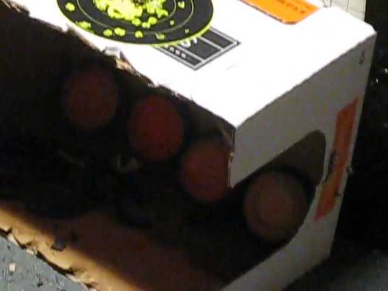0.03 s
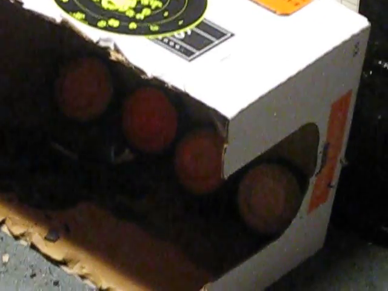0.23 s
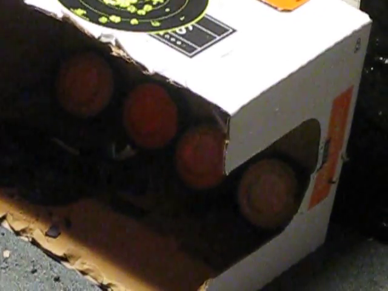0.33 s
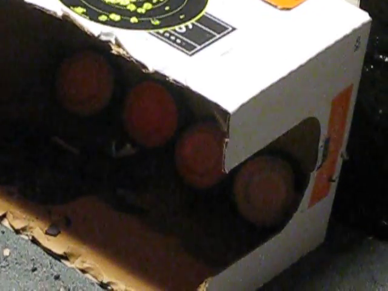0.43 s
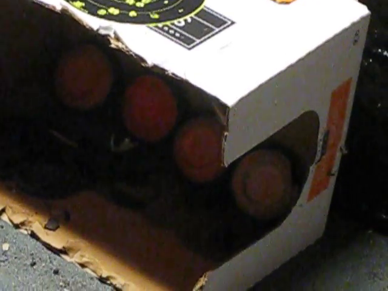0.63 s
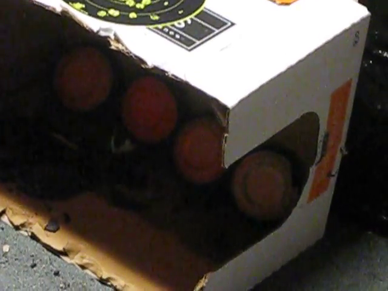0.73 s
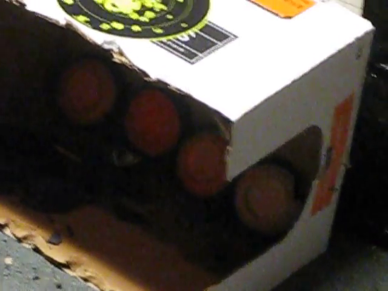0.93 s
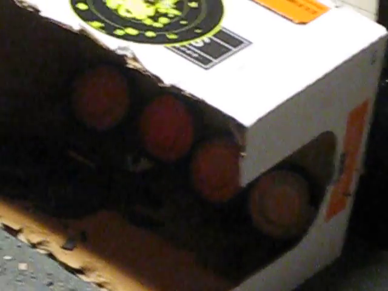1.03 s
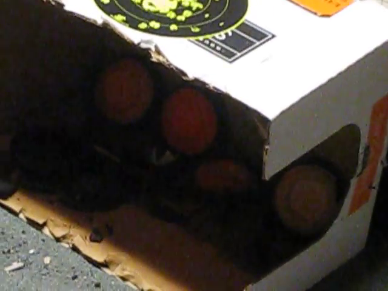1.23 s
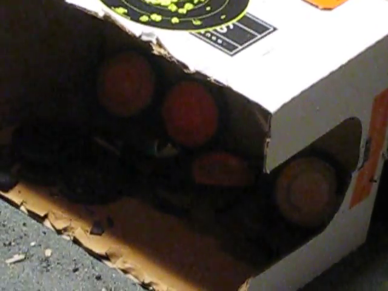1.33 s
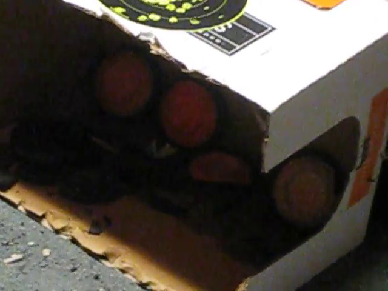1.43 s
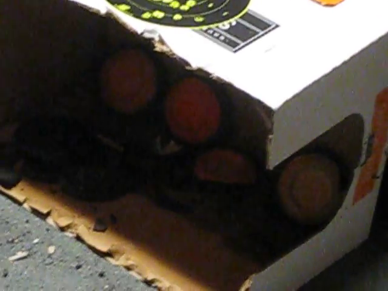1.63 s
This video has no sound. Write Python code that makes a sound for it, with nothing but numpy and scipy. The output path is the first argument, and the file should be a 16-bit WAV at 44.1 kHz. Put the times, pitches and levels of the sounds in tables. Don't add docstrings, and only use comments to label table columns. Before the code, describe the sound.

An air pistol cracks twice indoors, each shot followed by pieces clattering and rolling in cardboard

```python
import sys
import numpy as np
from scipy import signal
from scipy.fft import rfft, irfft, next_fast_len
from scipy.io import wavfile
from scipy.ndimage import uniform_filter1d, map_coordinates

SR = 44100
rng = np.random.default_rng(int(sys.argv[2]) if len(sys.argv) > 2 else 0)


def inscribe(sig):
    pcm = np.round(np.clip(np.atleast_2d(sig).T, -1, 1) * 32767)
    wavfile.write(sys.argv[1], SR, pcm.astype(np.int16))


def natural_amplitude(level_db):
    exponent = np.asarray(level_db, float) / 20
    return 10 ** exponent


N = 74970
T = np.arange(N) / SR

# start in seconds, peak level in dB.
SHOTS = [
    (.3356, 0),
    (1.0857, 0),
]
# frequency in Hz, level in dB.
GRIT_SPECTRUM = [(3000, -5), (7000, -10.5), (14400, -13.5), (16500, -17), (17500, -45)]


def unit(x):
    return x / np.sqrt(np.mean(x ** 2) + 1e-20)


def along(points, hz):
    f, v = np.transpose(points)
    return np.interp(np.log(hz + 1), np.log(f + 1), v)


def filtered(x, response):
    m = next_fast_len(len(x) + 8192)
    f = np.fft.rfftfreq(m, 1 / SR)
    return irfft(rfft(x, m) * response(f), m)[:len(x)]


def peak(f, hz, wide_hz):
    return 1j * f * wide_hz / (hz * hz - f * f + 1j * f * wide_hz)


def body(peaks):
    def response(f):
        return sum((-1) ** k * natural_amplitude(db) * peak(f, hz, wide_hz) for k, (hz, wide_hz, db) in enumerate(peaks))
    return response


def noise(spectrum, size=N):
    return unit(filtered(rng.standard_normal(size), lambda f: natural_amplitude(along(spectrum, f))))


def fall(s, t60, hold=0):
    return (T >= s) * natural_amplitude(-60 * np.clip(T - s - hold, 0, None) / t60)


def bumps(per_s, spread_db):
    hits = rng.random(N) < per_s / SR
    size = natural_amplitude(spread_db * np.minimum(rng.exponential(size=N), 2))
    return unit(hits * size * rng.choice([-1, 1], N))


def scattered(response, per_s, spread_db, smooth):
    drive = bumps(per_s, spread_db) + smooth * rng.standard_normal(N)
    return unit(filtered(drive, response))


def floor():
    # frequency in Hz, level in dB.
    hiss_spectrum = [(15, -42), (25, -11.5), (539, -2.5), (618, -1), (689, -8.5), (3770, -15.5),
                     (17500, -32)]
    # frequency in Hz, level in dB.
    hum_tones = [(118.4, -57), (188.4, -53.5)]
    knots = rng.standard_normal((len(hum_tones), 20))
    where = np.meshgrid(range(len(hum_tones)), T * 9, indexing="ij")
    drift = map_coordinates(knots, where)
    hum = sum(natural_amplitude(db + 5.5 + 1.3 * d) * np.sin(2 * np.pi * hz * T + .6 * d)
              for (hz, db), d in zip(hum_tones, drift))
    return natural_amplitude(-46) * noise(hiss_spectrum) + hum


def sheet():
    # frequency in Hz, level in dB.
    sheet_modes = [(1550, -0.5), (2110, 2), (2430, 4.5), (2755, 7), (3230, 3.5), (3690, -1), (3940, 3.5),
                   (4730, -5.5), (5200, 2), (5680, 0), (6860, -6), (9750, -8.5), (11800, -10), (13700, -15)]
    # frequency in Hz, level in dB.
    wash_spectrum = [(240, -67), (400, -47), (834, -12.5), (1050, -14), (3790, -10), (15500, -29)]
    # time in seconds, level in dB.
    clatter_level = [(.188, -55.5), (.192, -27.5), (.214, -21.5), (.219, -15), (.24, -16), (.28, -19.5),
                     (.326, -25.5), (.345, -57)]
    # frequency in Hz, width in Hz, level in dB.
    earlier_modes = [(1660, 42, -10), (2510, 59, -2), (2800, 26, -6), (3220, 150, -11), (3820, 33, 1),
                     (4200, 40, -11), (5110, 150, -10), (5700, 32, -14), (5870, 17, -12), (6360, 23, -7),
                     (6660, 37, -5), (8970, 33, -15)]
    width_per_khz = 17
    belly_hz, belly_sag, belly_db, belly_t60 = 872, .4, -10, .3

    ringing = body([(hz, hz * 1e-3 * width_per_khz, db) for hz, db in sheet_modes])
    ring = scattered(ringing, per_s=2500, spread_db=4, smooth=1.2)
    since = T - clatter_level[3][0]
    sagging_hz = belly_hz * (1 - belly_sag * np.clip(since, 0, .15))
    flutter = 1 + 0.22 * unit(uniform_filter1d(rng.standard_normal(N), size=500))
    phase = 2 * np.pi * np.cumsum(sagging_hz) / SR + .5 * flutter[::-1]
    swell = np.clip(since / 0.014, 0, 1) * fall(0, belly_t60, hold=0.25)
    belly = natural_amplitude(belly_db) * flutter * np.sin(phase) * swell
    metal = unit(ring + natural_amplitude(-4) * noise(wash_spectrum)) + belly
    clatter = natural_amplitude(np.interp(T, *np.transpose(clatter_level))) * metal

    earlier_ring = scattered(body(earlier_modes), per_s=2500, spread_db=4, smooth=1.2)
    earlier = natural_amplitude(-36) * fall(0, 0.45) * earlier_ring
    earlier += natural_amplitude(-36) * fall(0, 0.44) * noise(wash_spectrum)
    return clatter + earlier


def rolling(rows, box, per_s):
    s, db, grit_db = np.transpose(rows)
    fade_in = np.clip((T - s[0]) / 0.04, 0, 1)
    fade_out = np.clip((s[-1] + 0.034 - T) / 0.022, 0, 1)
    grit = scattered(lambda f: natural_amplitude(along(GRIT_SPECTRUM, f)), per_s=2700, spread_db=5.5, smooth=0.88)
    rumble = scattered(body(box), per_s, spread_db=0, smooth=0.71)
    mixture = rumble + natural_amplitude(np.interp(T, s, grit_db)) * grit
    return fade_in * fade_out * natural_amplitude(np.interp(T, s, db)) * mixture


def rolls():
    # time in seconds, level in dB, grit level in dB.
    roll_path = [(.445, -40, -32), (.505, -32.5, -0.5), (.59, -26.5, -0.5), (.65, -27, -31),
                 (.70, -29.5, -27), (.74, -48, -26)]
    # time in seconds, level in dB, grit level in dB.
    topple_path = [(1.2, -29.5, 5), (1.24, -30, -0.5), (1.3, -29.5, 4.5), (1.38, -28.5, -20),
                   (1.43, -39, -13), (1.55, -40.5, -21), (1.7, -65, -29)]
    # frequency in Hz, width in Hz, level in dB.
    roll_box = [(154, 17, -4), (513, 154, -2.5), (746, 30, -1.5), (770, 140, -10.5), (1050, 210, 3.5),
                (1840, 1100, -8)]
    # frequency in Hz, width in Hz, level in dB.
    topple_box = [(250, 113, -4), (572, 57, -5), (968, 59, -3.5), (1770, 310, -14), (3140, 250, -15.5)]
    return rolling(roll_path, roll_box, per_s=550) + rolling(topple_path, topple_box, per_s=900)


def pat(s, hz):
    out = np.zeros(N)
    near = slice(round(s * SR) - 256, round(s * SR) + 256)
    turns = (T[near] - s) * hz
    width_cycles = .5
    out[near] = -np.sin(2 * np.pi * turns) * np.exp(-(turns / width_cycles) ** 2 / 2)
    return out


def knocks():
    # time in seconds, peak level in dB, pitch in Hz.
    bounces = [(0.473, -24, 1150), (0.483, -23, 1100), (0.51, -15.0, 1240.0), (0.5146, -18.0, 1030.0),
               (0.5201, -15.0, 1010.0), (0.5314, -14.0, 930.0), (0.5374, -12.0, 900.0),
               (0.5456, -15.0, 1890.0), (0.5553, -13.0, 980.0), (0.5641, -16.0, 1460.0),
               (0.5677, -15.0, 1110.0), (0.5748, -14.0, 1060.0), (0.5837, -13.0, 1100.0),
               (0.5907, -13.0, 1000.0), (0.5957, -14.0, 850.0), (0.6024, -17.0, 660.0),
               (0.609, -15.0, 1000.0), (0.6146, -14.0, 830.0), (0.637, -18.0, 1300.0),
               (0.6405, -12.0, 840.0), (0.6442, -11.0, 930.0), (0.6547, -14.0, 920.0),
               (0.6586, -18.0, 1020.0), (0.6647, -20.0, 880.0), (0.6705, -18.0, 1440.0),
               (0.6743, -18.0, 1350.0), (0.6778, -20.0, 1300.0), (0.6817, -20.0, 930.0),
               (0.704, -21.0, 800.0), (0.7558, -10.0, 1490.0), (0.7607, -13.0, 1710.0),
               (0.765, -16.0, 1680.0), (0.7727, -15.0, 1080.0), (0.922, -17.0, 1960.0),
               (0.927, -14.0, 1730.0), (0.9314, -19.0, 980.0), (0.951, -20.0, 930.0),
               (1.2657, -18.0, 820.0), (1.2718, -18.0, 1000.0), (1.2934, -18.0, 930.0),
               (1.3103, -18.0, 990.0), (1.3345, -17.0, 670.0), (1.3405, -15.0, 980.0),
               (1.3502, -16.0, 670.0), (1.3645, -11.0, 870.0), (1.3693, -16.0, 660.0),
               (1.3776, -18.0, 950.0), (1.449, -13, 1100), (1.4535, -17, 800)]
    blow_start = [.4945, .5052, .6318, .7495, .846, .9185, 1.0424, 1.236, 1.289, 1.328, 1.356, 1.428,
                  1.4455, 1.501, 1.632, 1.675]
    blow_level = [-17, -9, -6.5, 0, -24, -8, -8, -19, -20, -13, -8.5, -21, -9, -21, -30, -28]
    # shiver level in dB, pitch in Hz, ring t60 in seconds.
    panel = [(-24, 930, 0.053), (-21.5, 1680, 0.31), (-22.5, 1020, 0.075), (-17.5, 1340, 0.14),
             (-26, 3250, 0.033), (-22, 1360, 0.11), (-20.5, 1930, 0.09), (-35, 248.6, 0.062),
             (-40, 1000, 0.037), (-27, 910, 0.14), (-20.5, 1220, 0.05), (-41, 245, 0.038),
             (-20.5, 1330, 0.096), (-27.5, 880, 0.05), (-42.5, 830, 0.35), (-50, 235, 0.032)]
    # frequency in Hz, level in dB.
    card_spectrum = [(120, -53), (300, -17), (750, 0), (1100, -1), (2750, -2), (3200, -13), (4200, -9),
                     (11700, -50)]
    boom_hz, soft_hz = 400, 4500
    edge_db, edge_ratio = -11, 2.3

    out = sum(natural_amplitude(db) * pat(s, hz) for s, db, hz in bounces)
    for s, blow_db, (db, hz, t60) in zip(blow_start, blow_level, panel):
        shiver = unit(filtered(noise(card_spectrum), lambda f: .6 + peak(f, hz, hz * .8)))
        if hz < boom_hz:
            blow = fall(s, t60) * np.sin(2 * np.pi * hz * (T - s))
        else:
            blow = pat(s + 1 / hz, hz) + natural_amplitude(edge_db) * pat(s + 1 / hz, edge_ratio * hz)
        after = s + 2 / hz
        decay = fall(after, t60) + 0.11 * fall(after, 3 * t60)
        out += natural_amplitude(blow_db) * blow + natural_amplitude(db) * decay * shiver
    return filtered(out, lambda f: (soft_hz / (soft_hz + 1j * f)) ** 2)


def ticks():
    tick_start = [.5097, .5397, .578, .5891, .621, .6315, .7105, .7173, .7368, .752, .7781, .8355, .870,
                  .8979, .947, 1.0476, 1.2645, 1.338, 1.3853, 1.400, 1.4711, 1.5264, 1.5464, 1.5728, 1.6387]
    # peak level in dB, pitch in Hz.
    tick_tone = [(-35, 11300), (-21.5, 10000), (-13.5, 12000), (-13.5, 14400), (-21, 10400), (-9.5, 14000),
                 (-14.5, 10600), (-8, 16000), (-7.5, 14100), (-24, 9000), (-10, 14400), (-10.5, 21600),
                 (-17.5, 24000), (-18, 17700), (-31, 12000), (-8.5, 15000), (-10, 15000), (-15, 9100),
                 (-11.5, 12700), (-27, 11000), (-22.5, 12300), (-41, 9500), (-28.5, 10500), (-19.5, 13400),
                 (-37, 10600)]
    t60, echo_s, echo_db = .007, .0021, -8
    linger_db, linger_t60 = -10, 0.19
    low_spectrum = [(1500, -42), (3000, 1), (7000, 15), (9000, -45)]  # (Hz, dB)

    out = np.zeros(N)
    for s, (db, hz) in zip(tick_start, tick_tone):
        fizz = unit(filtered(rng.standard_normal(N), lambda f: peak(f, hz, hz * .15)))
        fizz += natural_amplitude(-12) * noise(GRIT_SPECTRUM) + natural_amplitude(-22) * noise(low_spectrum)
        decay = fall(s, t60) + natural_amplitude(echo_db) * fall(s + echo_s, t60)
        decay += natural_amplitude(linger_db) * fall(s, linger_t60)
        out += natural_amplitude(db - 7.5) * decay * fizz
    return out


def clinks(events, modes, crack_db, wander=0.47):
    # frequency in Hz, level in dB per Hz.
    crunch_spectrum = [(1200, -34), (2800, 4), (6200, 0), (7500, -26), (12000, -9), (17000, -44)]
    rough_hz = modes[1][0] / 25
    out = np.zeros(N)
    for s, db in events:
        rough = unit(filtered(rng.standard_normal(N), lambda f: 1 / (1 + 1j * f / rough_hz)))
        ring = np.zeros(N)
        for hz, level, t60 in modes:
            uneven_db = rng.normal(0, 2)
            tone = np.sin(2 * np.pi * hz * (T - s) + wander * rough)
            ring += natural_amplitude(level + uneven_db) * fall(s, t60) * tone
        crack = fall(s, .025) * noise(crunch_spectrum)
        out += natural_amplitude(db) * (ring + natural_amplitude(crack_db) * crack)
    return out


def clay():
    # start in seconds, peak level in dB.
    disc_hits = [(1.215, -22), (1.3305, -6), (1.3385, -6), (1.346, -12), (1.369, -18), (1.388, -24),
                 (1.41, -26)]
    # frequency in Hz, level in dB, t60 in seconds.
    disc_modes = [(2940, -6, .04), (3380, 1, .04), (4200, -8, .03), (5800, 4, .04), (10300, -16, .03)]
    # start in seconds, peak level in dB.
    chip_hits = [(.716, -26)]
    # frequency in Hz, level in dB, t60 in seconds.
    chip_modes = [(3100, -8, .03), (5400, -12, .1), (6520, -6, .09), (9180, -9, .06), (10640, -12, .04),
                  (12060, 7, .05)]
    # start in seconds, peak level in dB.
    shard_hits = [(.7515, -28)]
    # frequency in Hz, level in dB, t60 in seconds.
    shard_modes = [(3100, 0, .14), (5000, -10, .3), (6520, -5, .14), (10080, 2, .035), (11600, 0, .05),
                   (13300, -3, .03)]
    # start in seconds, peak level in dB.
    squeak_starts = [(1.645, -63), (1.656, -51), (1.672, -45)]
    # frequency in Hz, level in dB, t60 in seconds.
    squeak_modes = [(2650, 0, .06), (2700, -2.2, 0.045)]
    discs = natural_amplitude(-8.5) * clinks(disc_hits, disc_modes, crack_db=-6)
    chips = clinks(chip_hits, chip_modes, crack_db=-12, wander=.25)
    shards = clinks(shard_hits, shard_modes, crack_db=-20, wander=.2)
    squeaks = clinks(squeak_starts, squeak_modes, crack_db=-30)
    return discs + chips + shards + squeaks


def pistol():
    # frequency in Hz, level in dB per Hz.
    blast_spectrum = [(35, -37), (60, -7.5), (900, -5), (5990, -1), (7800, -2), (10900, 6), (16800, 2.5),
                      (18500, -52)]
    # frequency in Hz, level in dB.
    runup_spectrum = [(120, -39), (900, -11), (2200, -9), (6350, -18.5), (7500, -21), (10700, -17),
                      (17000, -35)]
    # frequency in Hz, level in dB per Hz.
    tail_spectrum = [(30, -10.5), (150, -12.5), (820, 0.5), (2030, 1.5), (6330, 1.5), (7840, -5.5),
                     (10200, -1.5), (17000, -10.5)]
    hammer_lead_s, hammer_db, hammer_t60, runup_db = .0052, -24, .003, -10
    blast_hold_s, blast_t60 = .0035, .018
    slap_s, slap_db, slap_t60, slap_hold_s = .013, -6, .014, 0.00067
    push_db, push_s = 2, .0004
    near_db, near_t60, far_db, far_t60 = -9.5, 0.065, -23, 0.93

    out = np.zeros(N)
    for s, db in SHOTS:
        h = s - hammer_lead_s
        click = natural_amplitude(hammer_db) * fall(h, hammer_t60) + natural_amplitude(runup_db) * (T > h) * (T < s)
        hammer = click * noise(runup_spectrum)
        slap = natural_amplitude(slap_db) * fall(s + slap_s, slap_t60, slap_hold_s)
        blast = (fall(s, blast_t60, blast_hold_s) + slap) * noise(blast_spectrum)
        u = np.clip(T - s, 0, None) / push_s
        push = natural_amplitude(push_db) * (T > s) * (1 - u) * np.exp(-u)
        decay = natural_amplitude(near_db) * fall(s, near_t60) + natural_amplitude(far_db) * fall(s, far_t60)
        out += natural_amplitude(db - 5.0) * (hammer + blast + push) + natural_amplitude(db) * decay * noise(tail_spectrum)
    return out


def room(x):
    # frequency in Hz, t60 in seconds.
    room_t60 = [(200, 0.49), (2000, 0.27), (12000, 0.23)]
    hz, t, z = signal.stft(rng.standard_normal(SR // 2), SR, nperseg=256)
    decay = natural_amplitude(-60 * t / along(room_t60, hz)[:, None])
    tail = signal.istft(z * decay, SR, nperseg=256)[1]
    delayed = np.pad(x, (200, 0))
    return signal.fftconvolve(delayed, tail / np.linalg.norm(tail))[:N]


def scene():
    duck_db, duck_s, low_cut_hz = -29, 0.21, 109
    small = knocks() + ticks() + clay()
    near = small + natural_amplitude(-9) * room(small) + rolls()
    near = filtered(near, lambda f: (1j * f / (low_cut_hz + 1j * f)) ** 2)
    gain_db = sum(duck_db * (T > s) * np.clip(1 - ((T - s) / duck_s) ** 2, 0, 1) for s, _ in SHOTS)
    return (pistol() + sheet() + near + natural_amplitude(gain_db) * floor())[None]


def roll_off(x):
    return signal.sosfilt(signal.butter(12, 19200, fs=SR, output="sos"), x)


def record(dry):
    dip_hz, dip_wide_hz, dip_depth = 7900, 950, .03
    clip_top, top_hz = 1.05, 15000
    x = filtered(dry[0], lambda f: 1 - (1 - dip_depth) * peak(f, dip_hz, dip_wide_hz))
    x = x / (1 + np.abs(x / clip_top) ** 6) ** (1 / 6)
    x = filtered(x, lambda f: 1 / (1 + (f / top_hz) ** 18))
    return roll_off(x[None])


dry = scene()
out = record(dry)
inscribe(out)
```